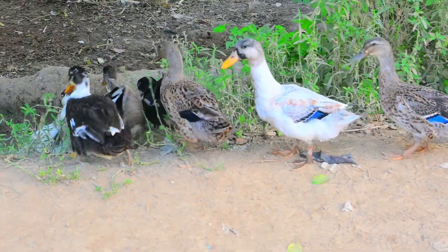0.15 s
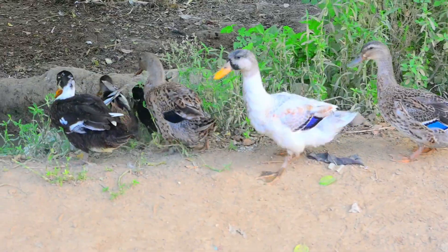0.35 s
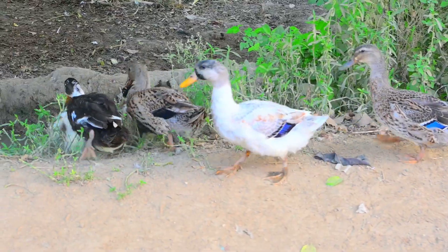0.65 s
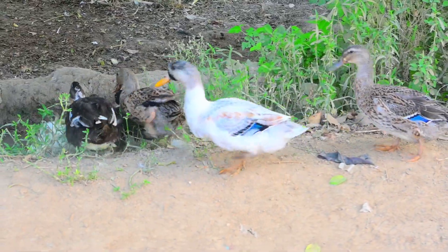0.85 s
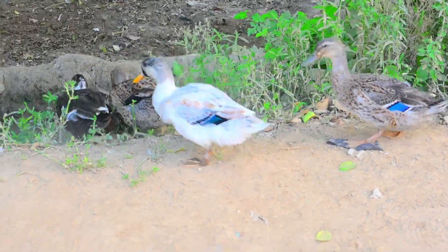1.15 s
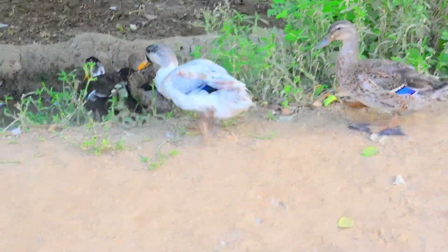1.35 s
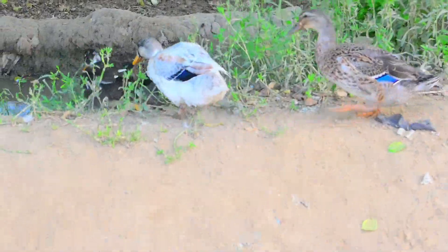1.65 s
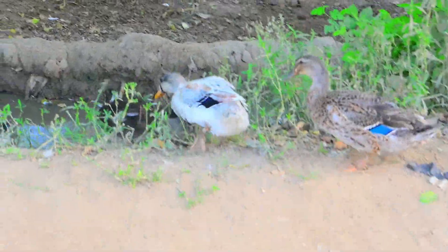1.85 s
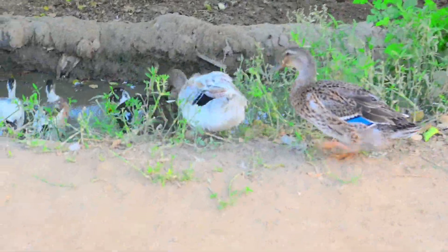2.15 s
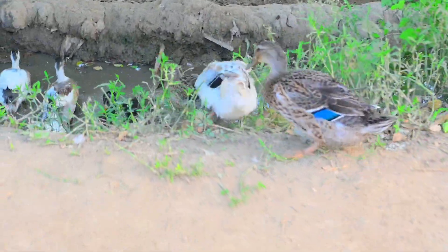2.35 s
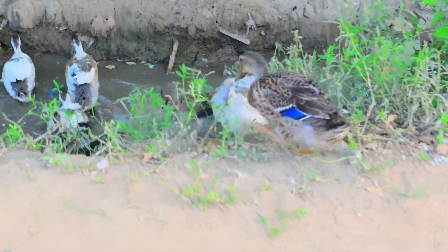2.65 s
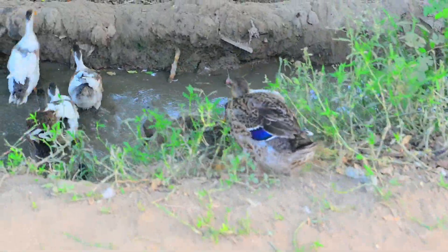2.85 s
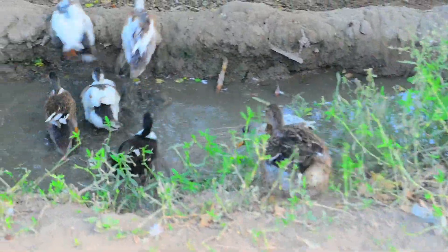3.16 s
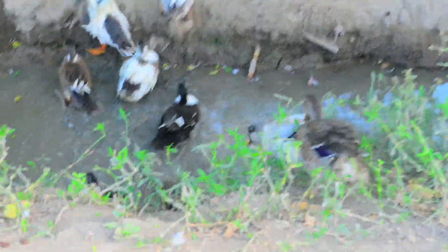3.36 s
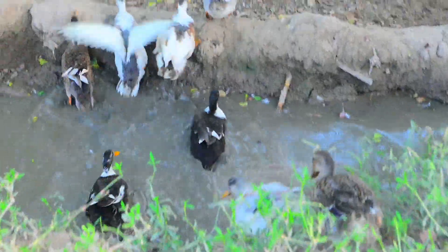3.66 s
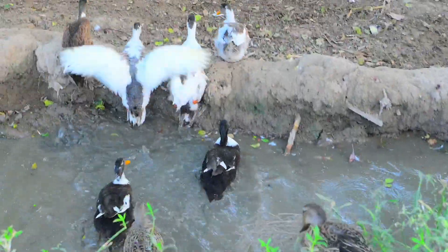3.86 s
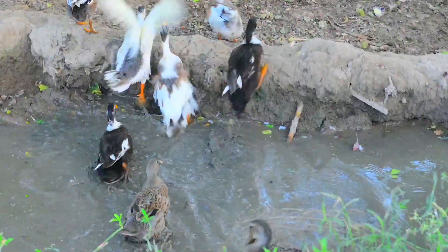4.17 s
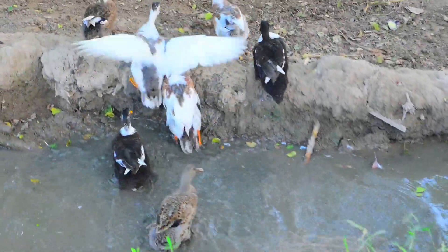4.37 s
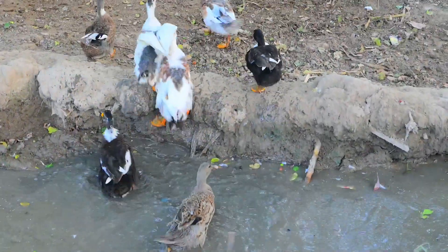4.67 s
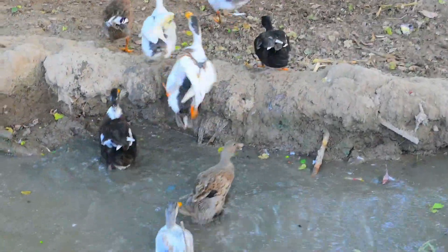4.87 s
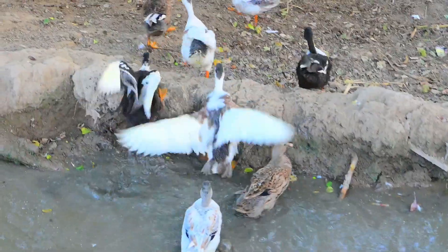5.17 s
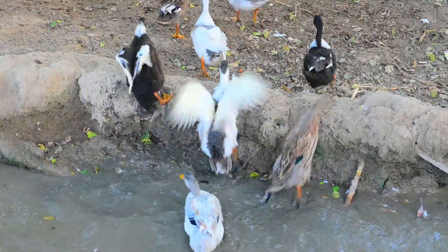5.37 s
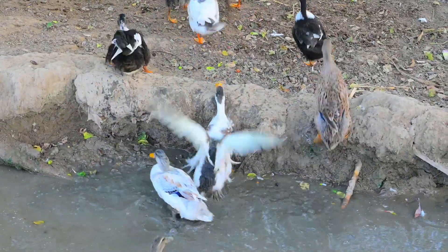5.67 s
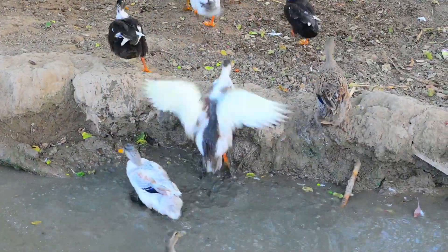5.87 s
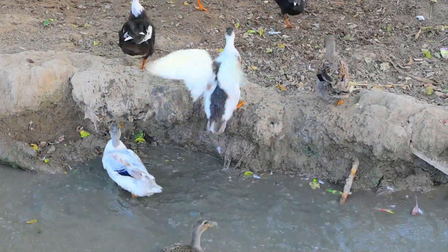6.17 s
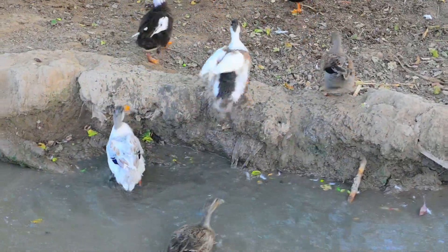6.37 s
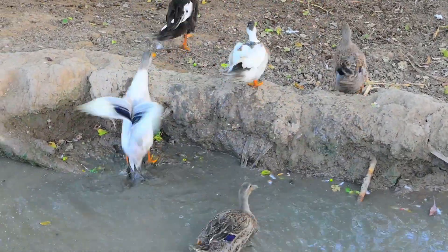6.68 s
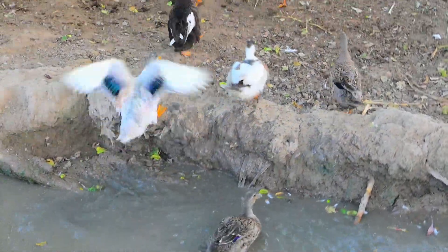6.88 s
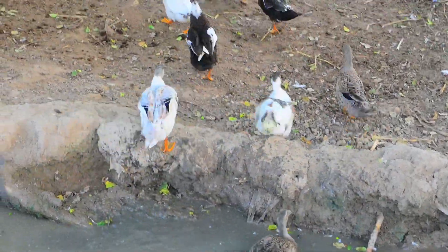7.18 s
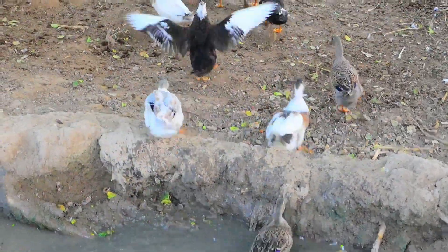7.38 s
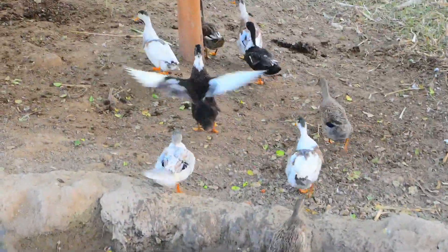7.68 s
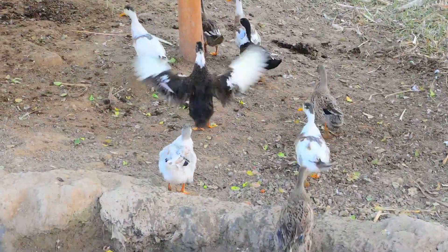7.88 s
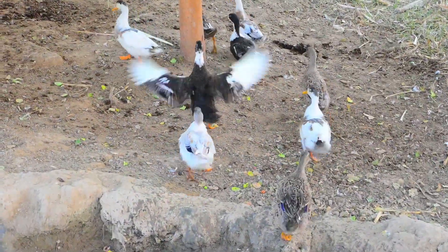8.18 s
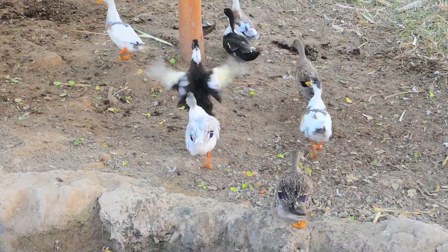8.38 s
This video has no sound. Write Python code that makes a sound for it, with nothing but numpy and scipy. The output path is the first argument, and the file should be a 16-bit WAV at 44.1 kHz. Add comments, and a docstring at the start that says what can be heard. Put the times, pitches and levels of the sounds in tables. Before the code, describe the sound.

Quiet open country with a faint distant engine thudding. A few soft swishes and small watery strokes come first, then ducks enter a muddy ditch and the splashing grows busy and close: bubbling, pattering droplets, gulps, crisp slaps of wings and feet. A nearer bird whistles repeatedly in the middle. A hard slap ends the churning; only a few ticks and light flaps remain.

```python
"""A muddy farm ditch in quiet open country: ducks slide in, paddle across and flap up the far bank.
Close to the microphone, showers of ringing bubbles mixed with noise make the churned water and spray;
noise bursts make slaps, ticks, swishes and short splashes, and rising sine tones make the gulps.
A nearer bird whistles in gliding sine tones; far calls, a low hum and thin high insect trills are
soft bands of noise. A distant one-cylinder engine thuds in low pulses; the banks echo faintly."""
import sys
import numpy as np
from scipy import signal
from scipy.fft import rfft, irfft, next_fast_len
from scipy.io import wavfile
from scipy.ndimage import uniform_filter1d

SR = 44100
rng = np.random.default_rng(int(sys.argv[2]) if len(sys.argv) > 2 else 0)


def dump(signal):
    """Clip the signal to [-1, 1] and save it as 16-bit WAV at the path in sys.argv[1]."""
    limited = np.clip(np.atleast_2d(signal).T, -1, 1)
    pcm = np.round(limited * 32767).astype(np.int16)
    wavfile.write(sys.argv[1], SR, pcm)


N = 376173
TIME = np.arange(N) / SR  # s

# Spectrum of the open air: f/Hz, relative level/dB
AIR_COLOUR = [(25, -7.5), (70, 12.5), (160, -3), (350, -1.5), (500, -8.5), (700, -3.5), (1300, -11),
              (2200, -17), (5000, -23), (7500, -21), (9000, -17.5), (15000, -33)]
AIR_DB = -77

# Distant engine, loudness of its thuds: t/s, peak level/dB before the scatter between firings
ENGINE_LOUDNESS = [(0, -65), (.7, -64.5), (1, -58), (1.8, -69), (2.35, -52), (2.7, -66), (3.2, -52),
                   (3.6, -65.5), (3.9, -55), (4.6, -59.5), (5.1, -54.5), (5.65, -50.5), (5.9, -66),
                   (7.3, -64.5), (7.75, -60), (8.5, -74.5)]
FIRING_HZ, FIRST_FIRING_S = 11.319, .074

# Far calls, a low hum and thin high insect trills, as soft bands of noise: t of the crest/s,
# level/dB before the swell trim, centre f/Hz, bandwidth/Hz, length/s
FAR_SOUNDS = [(.06, -59.5, 1770, 301, 0.11), (.07, -56, 8240, 705, 0.29), (.35, -69, 7160, 710, 0.39),
              (.335, -57.5, 1420, 70, 0.15), (.87, -51, 1313, 90, 0.13), (.945, -65, 1240, 90, 0.069),
              (1.27, -49.5, 1043, 130, 0.15), (1.4, -49.5, 1045, 130, 0.18), (1.49, -48.5, 1060, 150, 0.11),
              (3.84, -57.5, 354, 40, 0.098), (5.33, -39.5, 1171, 110, 0.077), (5.95, -64, 657, 129, 0.23),
              (7.29, -56.5, 1244, 218, 0.14), (8.07, -72, 8700, 904, .12), (8.45, -75.5, 7310, 607, 0.22)]

# Whistled notes of a nearer bird: t of the crest/s, level/dB before the flutter, crest f/Hz, length/s
WHISTLES = [(.005, -57, 1980, .24), (.075, -56, 1330, .19), (.403, -60, 1365, .19), (.733, -62, 1390, .21),
            (3.335, -50, 1280, .16), (3.585, -43, 1370, .15), (3.828, -41, 1460, .17),
            (4.073, -40, 1550, .18), (4.329, -36.5, 1610, .17), (4.582, -34, 1630, .17),
            (4.837, -35.5, 1590, .17)]
# Course of one whistle: t from the crest/note lengths, pitch/crest pitch, level re crest/dB
WHISTLE_ARCH = [(-.6, .87, -32), (-.53, .86, -10), (-.35, .84, -8), (-.18, .87, -9), (-.06, .98, -1),
                (0, 1, 0), (.06, .98, -1), (.16, .88, -8), (.31, .77, -12), (.4, .73, -34)]

# Soft swishes, sloshes and short splashes, wing whooshes: t of the crest/s,
# level/dB before the swell trim, centre f/Hz, length/s
SWISHES = [(.1, -53.5, 3620, 0.032), (.105, -55, 12500, .075), (0.337, -62.5, 11700, 0.2),
           (1.188, -40.5, 4970, 0.029), (1.304, -45, 4340, 0.082), (2.122, -50.5, 1630, 0.09),
           (2.274, -38, 3640, 0.026), (2.389, -48.5, 660, 0.1), (2.576, -47, 1940, 0.089),
           (4.198, -23.5, 2820, 0.0097), (4.573, -36, 1380, 0.084), (5.006, -38, 8800, .03),
           (5.1, -37.5, 1860, 0.056), (6.413, -37, 7480, 0.015), (6.571, -58, 864, 0.21),
           (7.105, -58, 1370, 0.05), (7.285, -58.5, 4070, .042), (7.334, -56, 783, 0.08),
           (7.504, -60.5, 2050, 0.018), (7.592, -63, 1560, 0.071), (7.705, -52.5, 630, 0.018),
           (7.936, -50.5, 1200, .11), (8.185, -58, 988, 0.08), (8.169, -79.5, 4240, 0.22),
           (8.381, -61, 2330, 0.042)]
# The band of a swish: a least width plus a share of its centre
SWISH_WIDTH_HZ, SWISH_WIDTH_SHARE = 270, 0.16

# Single drops and pecks that ring briefly: t/s, level/dB, f/Hz
DRIPS = [(4.0212, -33, 3520), (4.3795, -35.5, 5220), (4.639, -36, 2760), (5.136, -33, 1940),
         (5.326, -37, 2220), (5.972, -42, 1400), (5.982, -41.5, 7670), (6.06, -59, 7750),
         (6.105, -59.5, 7470), (6.146, -55.5, 7330), (6.174, -57.5, 2430), (6.508, -49, 1474),
         (6.884, -31.5, 6980), (7.309, -45.5, 765), (7.568, -29, 1670), (8.17, -52.5, 1210)]

# Air pockets that close behind a foot or a breast: t/s, level/dB before the band filter, f/Hz
GULPS = [(1.489, -42, 980), (1.789, -36.5, 728), (1.887, -34.5, 1130), (2.019, -37.5, 840),
         (2.078, -45.5, 646), (2.322, -50.5, 329), (2.381, -43, 537), (2.412, -39.5, 664),
         (2.739, -39, 1410), (2.885, -37, 1170), (2.35, -46, 630), (2.935, -47, 1010), (3.399, -41, 659),
         (3.428, -27, 827), (4.551, -21.5, 1236), (4.759, -25.5, 1380), (4.952, -48.5, 302),
         (5.01, -33, 1020), (5.252, -40, 1070), (5.541, -43.5, 854), (5.366, -41, 667), (5.678, -33, 857)]

# Loud slaps of wings and feet: t/s, body level/dB, body f/Hz, decay/s, crack level re body/dB
SLAPS = [(2.267, -44, 3520, .0045, 0.5), (2.9605, -42, 2550, 0.014, -5), (3.0512, -39.5, 4650, .0038, 9.5),
         (3.1573, -31, 3810, .0022, -37.5), (3.187, -35.5, 2330, .003, -8), (3.258, -38, 2680, .0017, -3),
         (3.347, -42.5, 1781, .006, 0), (3.436, -29.5, 2460, .003, -3.5), (3.4991, -26.5, 1800, .0013, 0.5),
         (3.6086, -36.5, 1510, .007, -11), (3.706, -41, 2330, .001, 6), (3.7386, -38, 2820, .002, -5),
         (3.7841, -25.5, 1980, .0013, -26.5), (3.897, -47.5, 2300, .005, -5),
         (3.9844, -41, 2234, .002, 7.5), (4.043, -42, 2540, .004, -1.5), (4.1047, -48.5, 2580, .001, 13),
         (4.1785, -27.5, 3060, .001, 0), (4.1975, -28, 2852, .0016, 6.5), (4.2354, -36, 3130, .006, 4.5),
         (4.953, -38.5, 3810, .0005, -5), (5.0387, -32.5, 2056, .0034, 3.5),
         (5.1867, -34.5, 3220, .0011, -12.5), (5.2528, -23.5, 1400, .0027, -2),
         (5.333, -34, 2400, 0.0033, -19.5), (5.6013, -39, 3830, .006, -2.5), (5.6546, -38, 1780, .0056, 0),
         (5.6806, -17, 1944, .0018, -11.5), (5.7034, -26.5, 2580, .0015, -0.5),
         (5.844, -48, 2070, .0022, -1), (6.4085, -58, 1312, 0.0012, 11.5),
         (6.8845, -34.5, 2800, 0.00079, 1.5), (6.931, -41, 3255, .0008, -8),
         (6.531, -55.5, 2230, 0.0081, -18), (6.737, -53, 2660, 0.0031, -61), (7.567, -39, 2060, 0.0039, 3),
         (7.653, -36, 2060, .005, -6.5), (7.69, -39, 2870, .006, -12)]
# Spectrum of the hiss after a slap, before its tilt: f/Hz, relative level/dB
HISS_COLOUR = [(500, -60), (1300, 4.5), (3000, 0), (5000, 3), (8500, 1.5), (11000, 0.5), (15500, -16)]
HISS_RISE_S = .002
SLAP_PAN_DB = -1  # left minus right

# Uneven paddling of the flock under the single strokes, before the trims:
# t/s, bubble level/dB, droplet level/dB, spray level/dB
PADDLING = [(0.6, -79, -72, -71), (0.78, -95.5, -71, -75), (0.91, -56.5, -56.5, -53.5),
            (1.3, -62.5, -79, -73), (1.64, -64.5, -63, -64), (1.99, -52.5, -55, -55),
            (2.17, -67, -64.5, -55), (2.44, -95, -58.5, -79), (2.9, -67, -57.5, -54.5),
            (3.26, -55, -46, -59), (3.57, -53.5, -55, -52.5), (3.84, -52, -47, -55),
            (4.09, -49.5, -52, -54), (4.29, -70.5, -48, -42), (4.54, -56, -61, -75),
            (5.17, -52, -52, -51.5), (5.64, -68.5, -55.5, -59.5), (5.96, -67, -67, -70.5)]
# Strokes of a foot or wing through water and wet mud, before the trims: t/s, droplet level/dB, hold/s,
# bubble level re droplets/dB, spray level re droplets/dB
STROKES = [(0.066, -76.5, 0.08, 0, 18), (0.299, -61.5, 0.044, -1.5, -1), (0.731, -49, 0.081, -7.5, 2.5),
           (1.022, -55, 0.1, 7.5, -1.5), (1.17, -46.5, 0.037, -5.5, 6), (1.298, -47.5, 0.15, -28, -2.5),
           (1.586, -50, 0.06, -24, -3), (1.832, -42.5, 0.042, -9.5, 0.5), (1.999, -48, 0.13, -1, -1.5),
           (2.27, -60.5, 0.033, -20, 10), (2.383, -65.5, 0.21, 14.5, -25), (2.45, -51, 0.025, -14, -1.5),
           (2.582, -49.5, 0.045, -20, 4), (2.726, -47, 0.044, -5.5, 0), (2.858, -55, 0.071, 8.5, 5.5),
           (2.986, -48.5, 0.11, -20, 2.5), (3.047, -39.5, 0.28, -6, 0), (3.188, -47.5, 0.07, 5, 7.5),
           (3.41, -42.5, 0.096, -2, 0.5), (3.549, -38, 0.017, -3.5, -9), (3.666, -40, .1, -33.5, -5.5),
           (3.881, -43, 0.018, -10.5, -2), (3.989, -51.5, 0.078, 1, 7.5), (4.129, -40.5, 0.051, -7.5, -7),
           (4.161, -39.5, 0.046, -7, -7), (4.356, -49.5, 0.025, -21, -20), (4.513, -50.5, 0.19, -16, -3),
           (4.751, -44, 0.064, -4, -6.5), (4.854, -43.5, 0.065, -23, -7), (5.016, -44.5, 0.036, 5.5, -2.5),
           (5.225, -37.5, 0.032, -8.5, -9.5), (5.356, -43.5, 0.043, 0, -11.5), (5.527, -49.5, 0.013, 1, 4),
           (5.638, -41, 0.097, -6, -0.5), (6.398, -73, 0.0071, 3.5, 19.5), (6.74, -65.5, 0.066, -25, -13),
           (6.818, -69, .04, -9, 7.5), (6.884, -68.5, 0.055, -16, -5), (7.438, -88, .04, -7.5, 15),
           (7.556, -41.5, 0.01, -40, -4.5), (7.678, -48.5, 0.029, -4.5, -7)]
STROKE_ATTACK_S, STROKE_SAG_DB_PER_S = .016, 21.5
# Extra fall of each layer once the hold of a stroke is over
BUBBLES_DIE_DB_PER_S, DROPS_DIE_DB_PER_S, SPRAY_DIES_DB_PER_S = 188, 157, 149
SETTLE_DB_PER_S = 229  # once the paddling stops

# Spectrum of the bubbles under the feet: f/Hz, relative level/dB
BUBBLE_COLOUR = [(100, -16), (200, -22.5), (450, -15), (700, 1), (1000, 4), (1400, 9.5), (2500, -7.5)]
# Spectrum of the droplets pattering back: f/Hz, relative level/dB
DROP_COLOUR = [(500, -34), (900, -10.5), (1300, -3), (2000, 5.5), (3200, 7), (4500, 1), (6500, -11.5),
               (12000, -41)]
# Spectrum of the fizzing spray, also of the crack in a slap: f/Hz, relative level/dB
SPRAY_COLOUR = [(1500, -31), (3200, -8.5), (4500, -1), (7000, -0.5), (10000, -3), (15500, -1.5)]

TOP_HZ = 16000


def undb(db):
    """Decibels to gain."""
    return 10 ** (np.asarray(db) / 20)


def unit(x):
    """Scale to rms 1."""
    return x / np.sqrt(np.mean(x ** 2) + 1e-20)


def colour(x, points):
    """Filter by a spectrum of (f/Hz, level/dB) points."""
    hz, db = np.transpose(points)
    size = next_fast_len(x.shape[-1])
    f = np.maximum(np.fft.rfftfreq(size, 1 / SR), 1)
    gain = undb(np.interp(np.log(f), np.log(hz), db))
    return irfft(rfft(x, size) * gain, size)[..., :x.shape[-1]]


def band(x, hz, width, order=2):
    """Band-pass round a geometric centre."""
    low = np.hypot(hz, width / 2) - width / 2
    edges = np.clip([low, low + width], 10, .48 * SR)
    return signal.sosfilt(signal.butter(order, edges, "band", fs=SR, output="sos"), x)


def ports(pair, apart, pan_db=0):
    """Two unrelated sounds to left and right: one shared, one opposed and kept to the treble."""
    side = apart * signal.lfilter(*signal.butter(1, 2500, "high", fs=SR), pair[1])
    pan = undb(np.array([[pan_db], [-pan_db]]) / 2)
    return np.array([pair[0] + side, pair[0] - side]) * pan


def add(out, s, x):
    """Mix x into out from time s."""
    start = int(round(s * SR))
    a, b = max(start, 0), min(start + x.shape[-1], out.shape[-1])
    if b > a:
        out[..., a:b] += x[..., a - start:b - start]


def patchy(x, db, span_s, span_bins, size=512):
    """Resonances that come and go at random over time and frequency."""
    spectrum = signal.stft(x, nperseg=size)[2]
    field = rng.standard_normal(spectrum.shape[-2:])
    span_frames = span_s * SR / (size / 2)
    for axis, span in ((0, span_bins), (1, span_frames), (0, span_bins)):
        field = uniform_filter1d(field, max(int(round(span)), 1), axis=axis)
    gain = undb(db * unit(field))
    gain = gain / np.sqrt(np.mean(gain ** 2))
    return signal.istft(spectrum * gain, nperseg=size)[1][..., :x.shape[-1]]


def swells(table, apart, trim_db=-2):
    """Bands of noise that swell and die away, the fall slower than the rise."""
    out = np.zeros((2, N))
    t = np.arange(-SR // 2, SR // 2) / SR
    for s, db, hz, width, length in table:
        steepness = np.where(t < 0, 4.2, 2.8)
        shape = 1 / np.cosh(np.clip(t / length * steepness, -50, 50))
        shape = shape * np.exp(-(np.minimum(t, 0) / length) ** 2)
        noise = band(rng.standard_normal((2, len(t))), hz, width)
        add(out, s + t[0], unit(ports(noise, apart)) * shape * undb(db + trim_db))
    return out


def bubble(hz, cycles, glide):
    """A pocket of air rings for some cycles, rising in pitch as it nears the surface."""
    age = np.arange(int(cycles * SR / hz) + 2) * hz / SR / cycles
    return np.sin(2 * np.pi * cycles * age * (1 + glide * age / 2)) * np.exp(-np.log(100) * age)


def air():
    """Quiet open country: steady coloured noise."""
    noise = colour(rng.standard_normal((2, N)), AIR_COLOUR)
    return unit(ports(noise, .7)) * undb(AIR_DB)


def engine(thud_hz=80, thud_s=0.0091, scatter_db=2):
    """Only the low thud of each slow firing carries this far."""
    out = np.zeros(N)
    t = np.arange(-SR // 25, SR // 25) / SR
    thud = -np.cos(2 * np.pi * thud_hz * t) * np.exp(-(t / thud_s) ** 2)
    for s in np.arange(FIRST_FIRING_S, N / SR, 1 / FIRING_HZ):
        add(out, s + t[0], thud * undb(scatter_db * rng.standard_normal()))
    return out * undb(np.interp(TIME, *np.transpose(ENGINE_LOUDNESS)))


def far_sounds():
    """Far calls, a low hum and thin high insect trills, as soft bands of noise."""
    return swells(FAR_SOUNDS, 0.89)


def whistles(flutter_db=1.45, waver=.006):
    """A nearly pure tone holds, arches up and drops, its pitch and level fluttering together."""
    out = np.zeros(N)
    place, ratio, shape_db = np.transpose(WHISTLE_ARCH)
    t = np.arange(-SR // 5, SR // 5) / SR
    for s, db, hz, length in WHISTLES:
        wobble = unit(band(rng.standard_normal(len(t)), 60, 120))
        arch = uniform_filter1d(np.interp(t / length, place, ratio), size=300)
        pitch = hz * arch * (1 + waver * wobble)
        loudness = np.interp(t / length, place, undb(shape_db), left=0, right=0)
        loudness = uniform_filter1d(loudness, size=300)
        tone = np.sqrt(2) * np.sin(2 * np.pi * np.cumsum(pitch) / SR)
        add(out, s + t[0], undb(db + flutter_db * wobble) * loudness * tone)
    return out


def yard(x, t60=0.17, wet_db=-21):
    """Banks, plants and walls return a faint, dull echo; wet_db is the level before halving."""
    t = np.arange(SR // 2) / SR
    noise = band(rng.standard_normal((2, len(t))), 810, 3000, order=1)
    echo = ports(noise, 1.0) * undb(-60 * t / t60) * (t > .008)
    echo = unit(echo) / np.sqrt(len(t))
    mono = x.mean(axis=0)[None]
    return undb(wet_db) / 2 * signal.oaconvolve(mono, echo, axes=1)[:, :N]


def swishes():
    """Swishes, sloshes, short splashes and wing whooshes: swelling noise, the higher the broader."""
    rows = [(s, db, hz, SWISH_WIDTH_HZ + SWISH_WIDTH_SHARE * hz, length) for s, db, hz, length in SWISHES]
    return patchy(swells(rows, .9), 3.5, .02, 2)


def drips(ring_s=0.002, width=0.089, tail_db=-20, tail_s=0.04):
    """A tick in one narrow resonance, with a faint tail."""
    out = np.zeros((2, N))
    t = np.arange(SR // 5) / SR
    decay = np.exp(-t / ring_s) + undb(tail_db) * np.exp(-t / tail_s)
    for s, db, hz in DRIPS:
        tick = rng.standard_normal((2, len(t))) * decay
        ring = ports(band(tick, hz, width * hz + 120), 0.2)
        # the level is that of the same energy held for two ring times
        add(out, s - ring_s / 2, unit(ring) * undb(db) * np.sqrt(2 * ring_s / t[-1]))
    return out


def gulps(cycles=24, glide=0.16, spread=0.089, follow_db=-7, follow_s=0.066):
    """One large bubble, then a few shorter, fainter ones torn from it."""
    out = np.zeros(N)
    for s, db, hz in GULPS:
        pocket = np.zeros(SR // 3)
        add(pocket, 0, bubble(hz, cycles, glide))
        for lag, size in rng.random((4, 2)):
            torn_hz = hz * np.exp(spread * (4 * size - 2))
            add(pocket, follow_s * lag, undb(follow_db) * bubble(torn_hz, cycles / 2, glide))
        add(out, s, undb(db) * band(pocket, hz, 0.45 * hz))
    return out


def slaps(hiss_t60=0.25, hiss_of_body_db=-27, hiss_of_crack_db=-15,
          scatter_db=-25, scatter_s=0.05, thump_db=-27):
    """A short clap of trapped air with a bright crack and a low thump; banks scatter it, a hiss trails."""
    out = np.zeros((2, N))
    t = np.arange(-SR // 100, SR // 2) / SR
    after = np.maximum(t, 0)
    # clap levels are those of the same energy held for 7 ms
    clap_gain = np.sqrt(.007 * SR / len(t))
    for s, db, hz, length, crack_db in SLAPS:
        noise = rng.standard_normal((4, 2, len(t)))
        # the rise is twice as fast as the decay
        blow = np.exp(-np.abs(t) / (length * np.where(t < 0, .5, 1)))
        blow = blow + undb(scatter_db) * (t > 0) * np.exp(-after / scatter_s)
        body = unit(ports(band(noise[0] * blow, hz, 0.92 * hz), 0.68, SLAP_PAN_DB))
        crack = unit(ports(colour(noise[1] * blow, SPRAY_COLOUR), 0.96, SLAP_PAN_DB))
        thump = unit(band(noise[3, 0] * blow, 130, 570))
        clap = body + undb(thump_db) * thump + undb(crack_db) * crack
        # a dull slap trails a duller hiss, a sharp crack a louder one
        slope_db = 9 * np.log(hz / 3000)
        hiss_colour = [(f, level + slope_db * np.log(min(f, 6000) / 6000)) for f, level in HISS_COLOUR]
        hiss = unit(ports(colour(noise[2], hiss_colour), 0.3, SLAP_PAN_DB))
        hiss = patchy(hiss, 1.6, .08, 5)
        hiss_gain = np.hypot(undb(hiss_of_body_db), undb(crack_db + hiss_of_crack_db))
        trail = hiss_gain * np.clip(1 + t / HISS_RISE_S, 0, 1) * undb(-60 * after / hiss_t60)
        add(out, s + t[0], undb(db) * (clap * clap_gain + hiss * trail))
    return out


def thrown(paddling_db, stroke_db, dies_db_per_s):
    """Strength of the moved water: strokes rise, hold and die on top of the changing level of the paddling."""
    s = np.transpose(PADDLING)[0]
    settling_db = SETTLE_DB_PER_S * np.maximum(TIME - s[-1], 0)
    power = undb(np.interp(TIME, s, paddling_db) - settling_db) ** 2
    t = np.arange(SR // 2) / SR
    rise = np.minimum(t / STROKE_ATTACK_S, 1)
    for (start, _, hold, _, _), db in zip(STROKES, stroke_db):
        fall_db = STROKE_SAG_DB_PER_S * t + dies_db_per_s * np.maximum(t - hold, 0)
        add(power, start, (rise * undb(db - fall_db)) ** 2)
    return np.sqrt(power)


def stirring(paddle_bubble_db=1):
    """Strength over time of the bubbles, the droplets and the spray."""
    _, bubbling, dropping, spraying = np.transpose(PADDLING)
    _, db, _, bubbles_db, spray_db = np.transpose(STROKES)
    return (thrown(bubbling + paddle_bubble_db, db + bubbles_db, BUBBLES_DIE_DB_PER_S),
            thrown(dropping, db, DROPS_DIE_DB_PER_S),
            thrown(spraying, db + spray_db, SPRAY_DIES_DB_PER_S))


def grains(rate, lo_hz, hi_hz, cycles, glide, scatter_db):
    """A shower of bubbles of all sizes, rate per second, mostly faint, a few strong."""
    out = np.zeros(N)
    pitches = np.geomspace(lo_hz, hi_hz, num=24)
    for hz in pitches:
        when, strength, born = rng.random((3000, 3)).T
        alive = born < rate * N / SR / len(pitches) / len(born)
        size = undb(scatter_db * np.minimum(-np.log(1 - strength), 4)) * alive
        starts = np.bincount((when * N).astype(int), size, N)
        out += signal.oaconvolve(starts, bubble(hz, cycles, glide))[:N]
    # each stroke carries a set amount of water, however it breaks up
    local_power = uniform_filter1d(out ** 2, size=4000)
    return out / np.sqrt(local_power + 1e-3 * np.mean(out ** 2))


def churn(strengths, trim_db=-1, pan_db=-1.9, patchy_db=3, wash=.65):
    """Paddling feet make bubbles; thrown water patters back and fizzes, with a wash of noise in each."""
    bubbles = grains(520, 200, 1500, 11, .2, 3.2)
    droplets = grains(1200, 1000, 5500, 10, .12, 3.4)
    spray = grains(3000, 3500, 14000, 8, .05, 3.8)
    layers = [(bubbles, BUBBLE_COLOUR, .8), (droplets, DROP_COLOUR, .7), (spray, SPRAY_COLOUR, .7)]
    out = np.zeros((2, N))
    for (shower, spectrum, apart), strength in zip(layers, strengths):
        noise = rng.standard_normal((2, N))
        pair = np.array([unit(shower + wash * noise[0]), noise[1]])
        water = ports(colour(pair, spectrum), apart, pan_db)
        out += unit(water) * strength * undb(trim_db)
    return patchy(out, patchy_db, .035, 4)


def scene():
    """The ducks close by; whistles, far sounds and engine beyond."""
    background = air() + engine() + far_sounds()
    calls = whistles()
    near = swishes() + drips() + gulps() + slaps() + churn(stirring())
    echoes = yard(calls[None], t60=0.38, wet_db=-9.5) + yard(near)
    return background + calls + near + echoes


def record(dry):
    """The camera cuts the top: a steep low-pass."""
    return signal.sosfilt(signal.ellip(10, .2, 70, TOP_HZ, fs=SR, output="sos"), dry)


dry = scene()
out = record(dry)
dump(out)
```